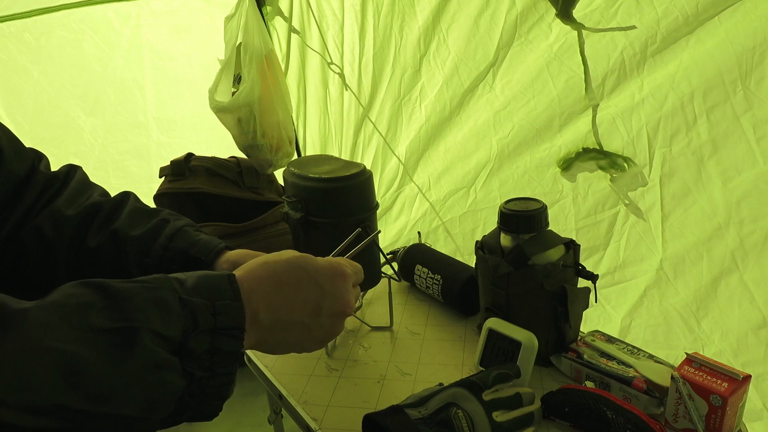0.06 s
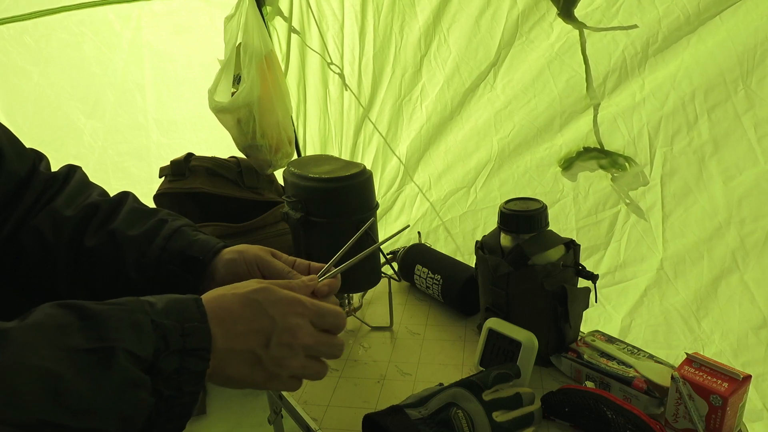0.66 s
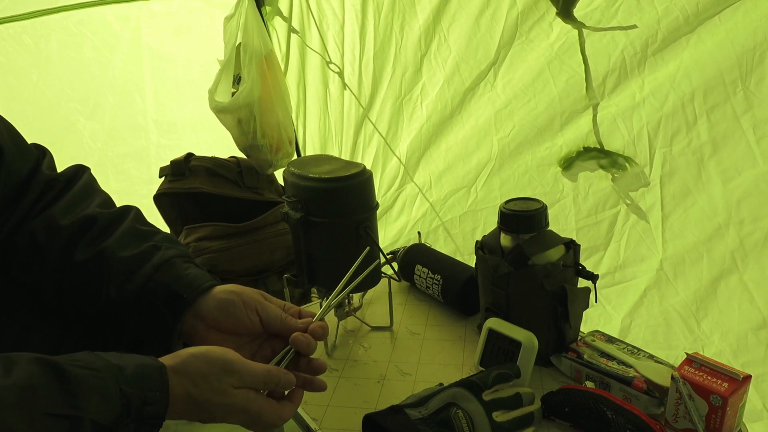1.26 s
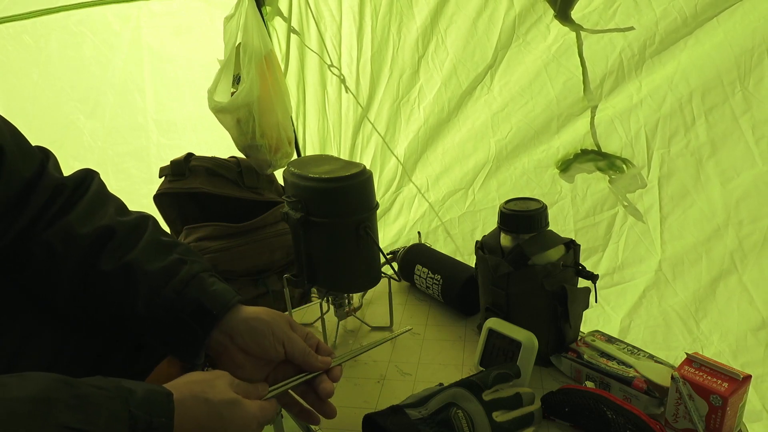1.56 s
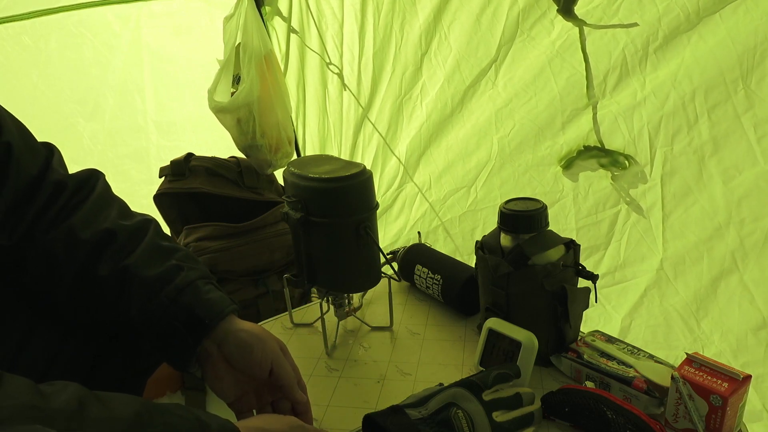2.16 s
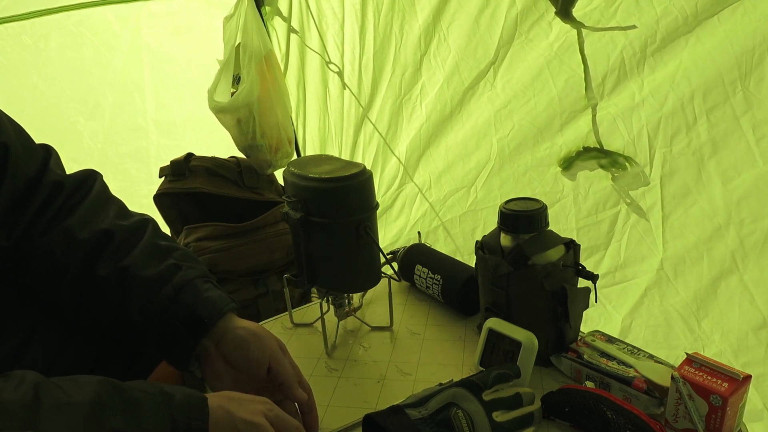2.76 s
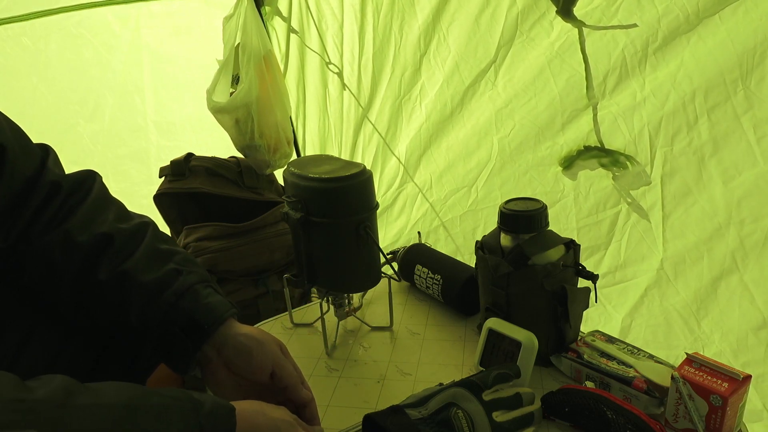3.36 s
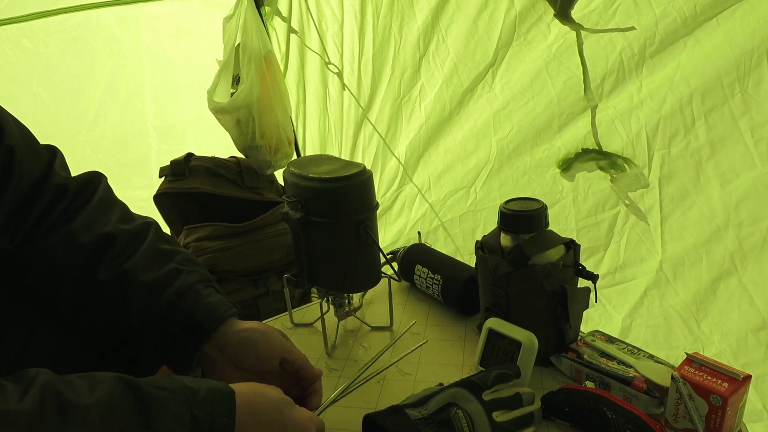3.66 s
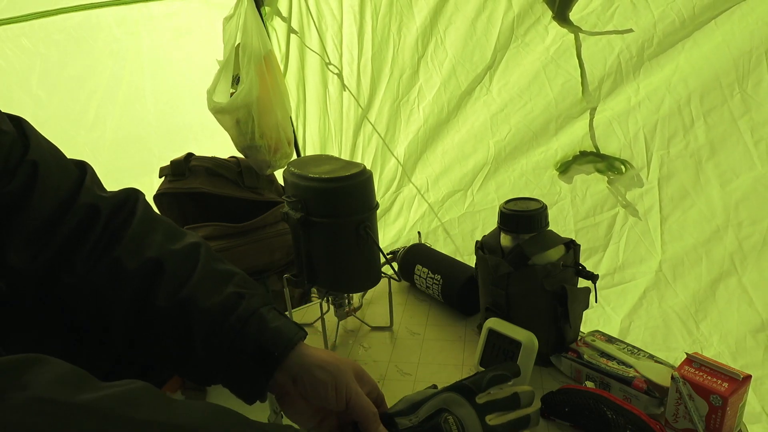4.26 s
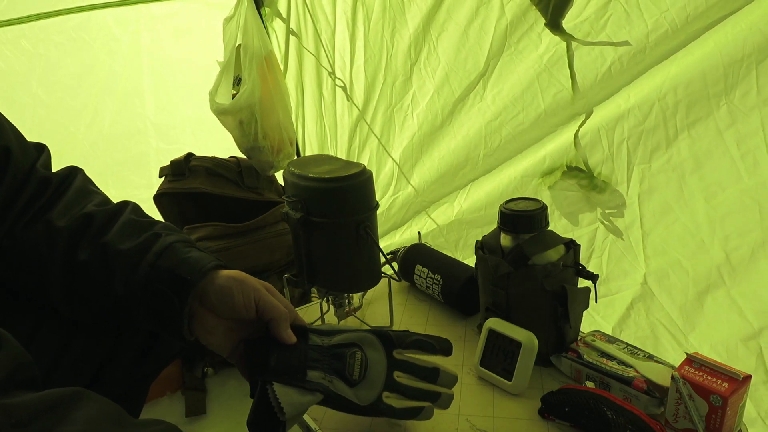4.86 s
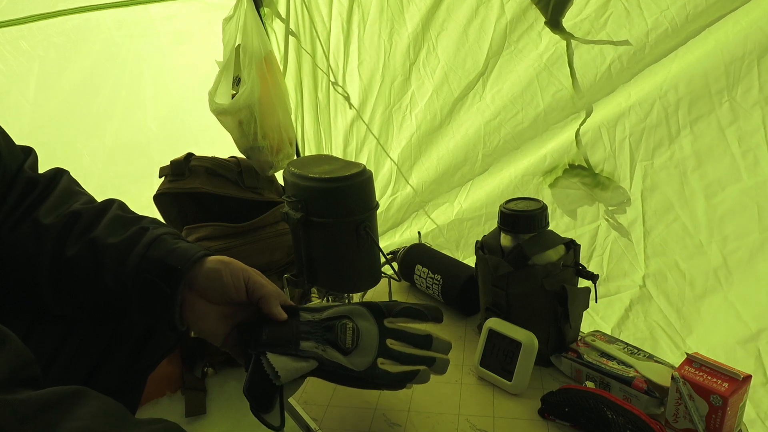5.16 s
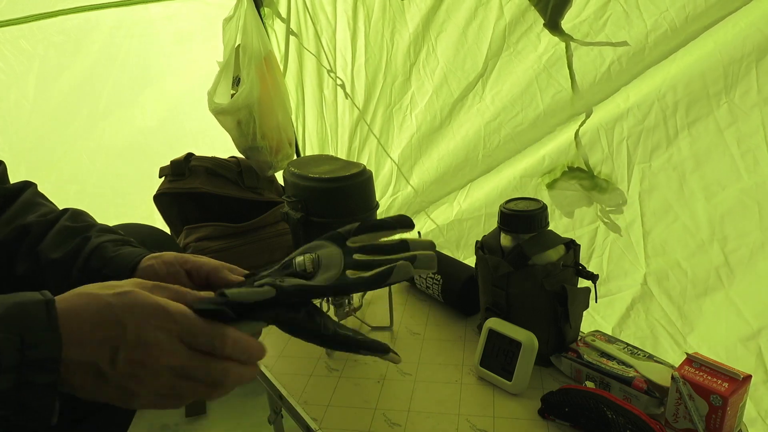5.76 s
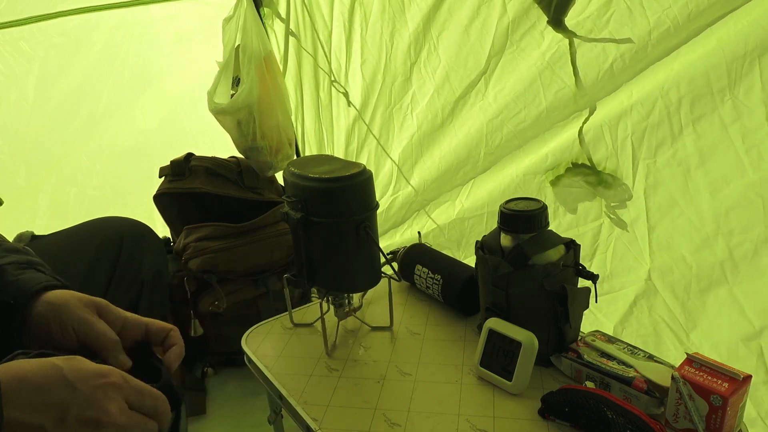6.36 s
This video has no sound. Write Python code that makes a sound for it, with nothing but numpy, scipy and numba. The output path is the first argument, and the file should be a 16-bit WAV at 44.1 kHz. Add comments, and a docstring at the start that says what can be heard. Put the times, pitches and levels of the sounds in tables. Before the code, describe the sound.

Metal tongs clink lightly, then clatter and slide on a camping table, followed by rustling sleeves and small glove snaps.

```python
"""Thin steel tongs clink in the hands, then knock, slide and clatter on a light metal camping table.
Each contact rings the steel's modes or the table's sheet; stick-slip makes the slides squeal and scrape.
Nylon sleeves swish and a glove snaps, with a few dull thuds, over the faint steady hiss inside a tent.
A fast compressor squashes each hard contact and lets its ring swell back up."""
import sys
import numpy as np
from scipy import signal
from scipy.fft import rfft, irfft, next_fast_len
from scipy.io import wavfile
from scipy.ndimage import uniform_filter1d, map_coordinates
from numba import njit

SR = 44100
rng = np.random.default_rng(int(sys.argv[2]) if len(sys.argv) > 2 else 0)


def bounce(signal):
    """Save signal as a 16-bit WAV file at the path given by the first command-line argument."""
    frames = np.transpose(np.atleast_2d(signal))
    limited = np.clip(frames, -1, 1)
    pcm = np.round(limited * 32767).astype(np.int16)
    wavfile.write(sys.argv[1], SR, pcm)


N = 282681

# tent hiss: freq_hz, density_db
HISS_SPECTRUM = [(12, -6), (20, -8.5), (46, -2), (88, -7), (127, -5), (163, -7), (285, -8), (399, -7.5),
                 (558, -13), (607, -13.5), (14700, -37), (16000, -38)]
# dull thuds and low knocks, one under the first loud clink: start_s, level_db, pitch_hz, ring_cycles
THUDS = [(.829, -31.5, 625, 5.4), (1.475, -45.5, 1170, 18), (1.729, -38, 65.3, 6.6), (1.781, -44, 61, 6.8),
         (1.872, -28, 91, 2.8), (3.018, -36, 550, 92), (4.043, -36, 234, 17), (4.046, -34, 700, 13),
         (6.021, -33, 164, 5)]
# arm movements: start_s, end_s, swish_db, rub_re_swish_db
ARM_MOVES = [(.5, 0.576, -62, -1.5), (0.718, .79, -39, -3), (1.054, 1.224, -46, -3),
             (1.486, 1.61, -50.5, -2.5), (1.71, 1.884, -40.5, 0), (2.053, 2.142, -47.5, 0.5),
             (2.587, 2.674, -46.5, 0), (2.8, 2.995, -56.5, -2), (3.093, 3.416, -49.5, 0),
             (3.762, 3.977, -42.5, -1.5), (4.103, 4.177, -36, -2), (4.251, 4.27, -30.5, -5),
             (4.605, 4.83, -39, -4), (4.986, 5.16, -49.5, -3), (5.295, 5.352, -53.5, 1.5),
             (5.41, 5.5, -38.5, -2), (5.572, 5.674, -35, -3.5), (5.77, 5.936, -32, -5.5),
             (6.183, 6.214, -35.5, -2), (6.23, 6.285, -45, 5.5), (6.362, 6.41, -37, -7)]
# dull nylon rub: freq_hz, density_db
RUB_SPECTRUM = [(150, -13), (300, -1.5), (700, 1.5), (1300, 1.5), (2200, -1.5), (3500, -21.5),
                (7000, -15.5)]
# bright nylon swish: freq_hz, density_db
SWISH_SPECTRUM = [(1200, -10), (2500, 1.5), (3800, 1.5), (6000, -1.5), (8500, -1.5), (11000, -9),
                  (15500, -13.5)]
# glove fabric and buckle snaps: start_s, relative_db, centre_hz
SNAPS = [(5.17, -22.5, 1600), (5.209, -27, 3950), (5.244, -31, 3980), (5.2619, -14.5, 12300),
         (5.384, -14.5, 8760), (5.391, -17, 5000), (5.68, -18, 3120), (5.6968, -14.5, 7670),
         (5.785, -23, 12000), (5.82, -21, 12000), (6.004, -20.5, 2000), (6.026, -13, 2150),
         (6.052, -8.5, 2140), (6.17, -12.5, 2210), (6.184, -15, 2190)]

# table sheet: freq_hz, width_hz, gain_db
SHEET_MODES = [(216, 28, 1.5), (301, 27, 0), (430, 108, -1.5), (500, 60, -7), (732.4, 20, 4.5),
               (818, 38, 0.5), (934, 58, -1), (1057, 83, -1), (1230, 43, 2), (1371, 110, 0),
               (1683, 400, -8), (2184, 540, -6.5), (2647, 120, -2.5), (2940, 81, -5.5), (3088, 29, 1.5),
               (3407, 180, -1), (3660, 130, -5.5), (3820, 83, 0.5), (4182, 83, -0.5), (4720, 360, -7),
               (5200, 210, -14), (5970, 510, -3.5), (7040, 500, -10), (9300, 1030, -10.5)]
# steel arm pressed on the table: freq_hz, width_hz, gain_db
PRESSED_MODES = [(1240, 165, 1), (2450, 140, -2), (3830, 250, -1.5), (5840, 1300, -10), (7200, 1600, -11.5)]
# steel lying free: freq_hz, width_hz, gain_db
FREE_MODES = [(5350, 270, -12), (7780, 40, 5), (7920, 180, -3), (10670, 390, -17), (14150, 130, -11),
              (14700, 120, -18.5)]
# lower bending modes of the steel: freq_hz, width_hz, gain_db
SHANK_MODES = [(1940, 74, -3), (3140, 140, 12), (3340, 93, -8), (3590, 300, 4.5), (4770, 120, -1.5)]
# hard contact: freq_hz, density_db
CRACK_SPECTRUM = [(5000, -37), (8700, 10.5), (10600, -8), (12000, 3), (13500, 2), (14500, -8), (15800, 1)]

# tips judder lightly on the table: start_s, end_s, relative_db
LIGHT_SLIDES = [(2.6, 2.7, -39), (2.725, 2.765, -30), (2.83, 2.875, -31), (2.9, 2.98, -38),
                (3.14, 3.16, -43)]
# tongs dragged with a heavier hand: start_s, end_s, relative_db
HEAVY_DRAGS = [(4.47, 4.62, -33.5), (4.65, 4.665, -17), (4.68, 4.735, -21.5), (4.75, 4.89, -31.5),
               (4.912, 4.925, -20.5)]
# tips stay on the table, which hums: start_s, end_s, relative_db
RESTS = [(2.57, 3.34, -46.5)]
# hand bears down, table booms: start_s, end_s, relative_db
LEANS = [(4.44, 4.53, -25), (4.66, 4.77, -28.5), (4.9, 4.93, -38)]
# one steel arm skids and sings, or taps the table once (4.43 s) so its pressed modes ring: start_s, end_s,
# level_db
SKIDS = [(1.9, 1.935, -33), (3.48, 3.518, -37.5), (3.58, 3.62, -35.5), (4.431, 4.433, -13.5),
         (4.44, 4.46, -37)]
# steel arms slide along each other: start_s, end_s, level_db
GRAZES = [(1.066, 1.085, -36), (1.1, 1.115, -45), (1.203, 1.24, -34), (1.255, 1.275, -42)]
# steel arms touch: start_s, level_db, low_mode_hz, low_mode_bias_db, shank_re_level_db
CLINKS = [(.829, -13.5, 5550, -1, -8.5), (.874, -29, 5400, -2, -9), (.984, -32.5, 5800, 1, -3.5),
          (1.075, -42, 6350, 0, 0.5), (1.202, -33, 6130, 7.5, -15), (1.21, -26.5, 6420, 4, -6.5),
          (1.22, -29, 5860, -3, -21), (1.231, -27, 5910, 5, -26), (1.256, -41, 6130, 1, -17),
          (1.39, -29.5, 5700, -1, -18), (1.403, -21, 5720, 5.5, -9), (1.523, -44.5, 5470, -2.5, -4.5),
          (1.628, -33, 5570, -5.5, -14), (4.738, -19, 5400, 2.5, -14), (4.802, -26, 5450, 2, -14),
          (4.811, -22, 5350, 2, -12), (5.057, -21, 5440, -9, -13)]
# tongs hit the table: start_s, force_db, hardness_db, steel_ring_db
KNOCKS = [(1.874, -5, 2.5, -21), (1.898, -23.5, 7, -24), (1.914, -31, 0, -24), (1.997, -9.5, 0, -27),
          (2.02, -21, 2, -43), (2.043, -20.5, 2, -58), (2.059, -26.5, 1, -46), (2.099, -40, -2.5, -42),
          (2.165, -36, -11, -60), (2.171, -25, 0.5, -43), (2.182, -42, -14.5, -61), (2.979, -39, -9, -61),
          (3.014, -27, 0, -20), (3.027, -26.5, 3.5, -41), (3.114, -41, -1.5, -68),
          (3.182, -31.5, -1.5, -22.5), (3.222, -15, 1.5, -23), (3.241, -18, 1.5, -38),
          (3.252, -23.5, 1, -35), (3.266, -23.5, 0.5, -45), (3.279, -29.5, 2, -47), (3.39, -31, 1, -23.5),
          (3.509, -34, -2, -42), (3.606, -30, 1, -42), (4.43, -33, 10.5, -21), (4.566, -13.5, 2.5, -22),
          (4.658, -13.5, -.5, -33), (4.675, -17.5, -3.5, -29), (4.735, -16, 0.5, -36), (4.757, -19, 1, -22),
          (4.81, -15.5, 1, -9), (4.831, -9.5, 2, -16), (4.85, -20, 3, -37), (4.862, -12, 4.5, -17),
          (4.892, -16.5, 1, -44), (4.908, -32, -5, -29), (5.057, -25, 3, -28), (5.084, -30, 0.5, -23)]

RING_TIME_S = np.arange(16384) / SR
MODE_SPREAD_DB = 5.5  # blow-to-blow scatter


def amp(db):
    return 10 ** (np.asarray(db) / 20)


def unit_rms(x):
    return x / np.sqrt(np.mean(x ** 2) + 1e-20)


def wobble(rate_hz):
    """Smooth random curve, rate_hz knots a second."""
    return map_coordinates(rng.standard_normal(int(N * rate_hz / SR) + 4), [np.arange(N) * rate_hz / SR])


def spectrum(points):
    """Gain curve through (freq_hz, gain_db) points."""
    freq_hz, gain_db = np.transpose(points)
    return lambda hz: amp(np.interp(np.log(hz + 1), np.log(freq_hz), gain_db))


def resonant(modes, lo_hz=30, hi_hz=18000, spread_db=0, count=1):
    """Band-limited gain curve of (freq_hz, width_hz, gain_db) modes, scattered anew per blow."""
    freq_hz, width_hz, gain_db = np.transpose(modes)
    power = amp(gain_db + spread_db * rng.standard_normal((count, len(freq_hz)))) ** 2
    def gain(hz):
        peaks = (1 + (2 * (hz - freq_hz[:, None]) / width_hz[:, None]) ** 2) ** -1.4
        edge_loss = (1 + (lo_hz / (hz + 1)) ** 10) * (1 + (hz / hi_hz) ** 10)
        return np.squeeze(np.sqrt(power @ peaks / edge_loss))
    return gain


def noise(gain, shape=N):
    """Coloured noise, rms 1."""
    white = rng.standard_normal(shape)
    size = next_fast_len(white.shape[-1])
    shaped = rfft(white, size) * gain(np.fft.rfftfreq(size, 1 / SR))
    return unit_rms(irfft(shaped, size)[..., :white.shape[-1]])


def rings(gain, t60_s, tail_db, tail_t60_s, attack_s=0.00011, count=1):
    """Responses to count blows: fast decay plus slower tail, rms 1 over the first 11 ms."""
    fade = amp(-60 * RING_TIME_S / t60_s) + amp(tail_db - 60 * RING_TIME_S / tail_t60_s)
    x = noise(gain, (count, len(RING_TIME_S))) * fade * (1 - np.exp(-RING_TIME_S / attack_s))
    return x / np.sqrt(np.mean(x[:, RING_TIME_S < .011] ** 2, axis=1, keepdims=True))


def placed(times_s, levels_db, sounds):
    """Sum of sounds, each at its time and level."""
    out = np.zeros(N + SR)
    for start_s, level_db, sound in zip(times_s, levels_db, sounds):
        out[round(start_s * SR):][:len(sound)] += amp(level_db) * sound
    return out[:N]


def strokes(rows, rise_s, fall_s):
    """Power-summed envelope of (start_s, end_s, level_db) moves; rise_s and fall_s per 20 dB."""
    t = np.arange(N) / SR
    power = 0
    for start_s, end_s, level_db in rows:
        away = np.maximum(start_s - t, 0) / rise_s + np.maximum(t - end_s, 0) / fall_s
        power += amp(level_db - 20 * np.minimum(away, 10)) ** 2
    return np.sqrt(power)


def tent_hiss():
    """Faint steady noise, strongest in the bass."""
    return amp(-51.5) * noise(spectrum(HISS_SPECTRUM))


def thuds():
    """Short dull thuds and low knocks: the more cycles of ring, the narrower the band."""
    start_s, level_db, pitch_hz, ring_cycles = np.transpose(THUDS)
    sounds = []
    for hz, cycles in zip(pitch_hz, ring_cycles):
        band = resonant([(hz, hz * 4 / cycles, 0)], hz * .5, hz * 2)
        sounds.extend(rings(band, t60_s=cycles / hz, tail_db=-12, tail_t60_s=3 * cycles / hz))
    return placed(start_s, level_db, sounds)


def sleeves():
    """Nylon on nylon: dull rub and bright swish, with weave grain and crackling creases."""
    still_swish_db, still_rub_db, creases_per_s = -59.5, -59, 58
    start_s, end_s, swish_db, rub_re_swish_db = np.transpose(ARM_MOVES)
    moves = lambda level_db: strokes(zip(start_s, end_s, level_db), rise_s=.25, fall_s=.2)
    swish_env = np.hypot(moves(swish_db), amp(still_swish_db))
    rub_env = np.hypot(moves(swish_db + rub_re_swish_db), amp(still_rub_db))
    grain = unit_rms(amp(1.1 * wobble(900) + wobble(45)))
    creases = (rng.random(N) < creases_per_s / SR) * amp(-0.5 + 5.5 * rng.standard_normal(N))
    crease_env = signal.fftconvolve(creases, amp(-60 * RING_TIME_S / .0032))[:N]
    crackle = swish_env * crease_env * noise(spectrum(SWISH_SPECTRUM))
    rub = rub_env * noise(spectrum(RUB_SPECTRUM))
    swish = swish_env * noise(spectrum(SWISH_SPECTRUM))
    return grain * (rub + swish) + crackle


def glove():
    """Creases flick over with dry snaps: the brighter, the shorter and more sudden."""
    start_s, relative_db, centre_hz = np.transpose(SNAPS)
    snaps = []
    for hz in centre_hz:
        t60_s = np.interp(hz, [2000, 13000], [.025, .006])
        attack_s = np.interp(hz, [2000, 13000], [.002, .0002])
        band = resonant([(hz, hz * .38, 0), (7000, 12000, -15)], lo_hz=350)
        snaps.extend(rings(band, t60_s, tail_db=-7.5, tail_t60_s=.083, attack_s=attack_s))
    return placed(start_s, relative_db - 15, snaps)


def slides():
    """Steel sticks and slips on the table: light touch squeals and hums, heavy scrapes and booms."""
    light = strokes(LIGHT_SLIDES, rise_s=.028, fall_s=.026)
    heavy = strokes(HEAVY_DRAGS, rise_s=.055, fall_s=.028)
    resting = strokes(RESTS, rise_s=.32, fall_s=.3)
    leaning = strokes(LEANS, rise_s=.06, fall_s=.18)
    slips = unit_rms(amp(2 * wobble(140)))
    pressure = unit_rms(amp(2.2 * wobble(50)))
    hum_env = amp(-2.5) * resting + amp(-18.5) * light
    hum = hum_env * noise(resonant([(296.3, 47, 7), (408, 58, -19)], 150, 500))
    squeal = amp(-7) * light * noise(resonant([(1345, 73, 0.5), (1100, 1500, -14.5)], 620, 6400))
    boom = amp(-4) * leaning * noise(resonant(SHEET_MODES + [(174, 38, -6)], 150, 320))
    scrape = amp(-5) * heavy * noise(resonant(SHEET_MODES + [(980, 260, 0.01)], 360, 7300))
    skid = strokes(SKIDS, rise_s=.0027, fall_s=.029) * noise(resonant(PRESSED_MODES, 490, 12000))
    return hum + skid + pressure * (squeal + boom) + slips * scrape


def grazes():
    """Steel rubs on steel; tiny slips keep its modes singing."""
    modes = [(2600, 500, -9), (3500, 500, -9), (6350, 700, 1), (8036, 300, -2)]
    song = noise(resonant(modes, 1900, 9500))
    slips = unit_rms(amp(5.2 * wobble(250)))
    return strokes(GRAZES, rise_s=.0053, fall_s=.022) * slips * song


def clinks():
    """The steel arms touch: grip shifts three modes together, touch point favours the low or main one."""
    start_s, level_db, low_hz, bias_db, shank_re_level_db = np.transpose(CLINKS)
    count = len(start_s)
    grip_shift = low_hz / 5750  # 1 = medium grip
    main_hz, high_hz = 8036 * grip_shift ** .15, 10900 * grip_shift ** .62
    attacks_s = np.interp(level_db, [-38, -20], [.002, .0006])  # quieter clinks: softer onset

    def mode(pitches_hz, width_hz, tail_db, tail_t60_s):
        bands = (resonant([(hz, width_hz, 0)], hz * .25, hz * 2.3) for hz in pitches_hz)
        return [rings(band, .024, tail_db, tail_t60_s, attack_s)[0]
                for band, attack_s in zip(bands, attacks_s)]

    shank = rings(resonant(SHANK_MODES, 1500, 4800, MODE_SPREAD_DB, count),
                  t60_s=.024, tail_db=-5, tail_t60_s=.084, attack_s=.00051, count=count)
    top = rings(resonant([(13000, 700, -9), (14500, 550, -3)], lo_hz=11000),
                t60_s=.02, tail_db=-13, tail_t60_s=.16, count=count)
    low = mode(low_hz, width_hz=370, tail_db=-11.5, tail_t60_s=.14)
    main = mode(main_hz, width_hz=250, tail_db=-12.5, tail_t60_s=.14)
    high = mode(high_hz, width_hz=750, tail_db=-1, tail_t60_s=.12)
    layers = [(shank_re_level_db, shank), (bias_db, low), (-bias_db, main), (-5.5, high), (-10, top)]
    return sum(placed(start_s, level_db + offset_db, sounds) for offset_db, sounds in layers)


def knocks():
    """Tongs hit the table: a crack, a new mix of sheet modes, a steel ring. Harder is brighter."""
    start_s, force_db, hardness_db, steel_ring_db = np.transpose(KNOCKS)
    count, medium_force_db = len(start_s), -20.5
    boom_db = -31 + .87 * (force_db - medium_force_db) - 1.07 * hardness_db
    panel_db = force_db - 1.5 - hardness_db
    clatter_db = force_db + 1.1 + hardness_db
    crack_db = force_db - 17 + 3.5 * hardness_db
    attack_s = np.interp(clatter_db, [-30, -12], [.004, .0006])[:, None]  # quieter knocks: softer onset
    # contact point decides which of the two lowest modes leads
    boom_edge_hz = np.interp(start_s, [1.9, 2.2, 3.6, 4.4], [174, 228, 230, 175])
    boom = [rings(resonant(SHEET_MODES, hz, hz * 1.46),
                  t60_s=.13, tail_db=5, tail_t60_s=.19, attack_s=.0021)[0] for hz in boom_edge_hz]
    panel = rings(resonant(SHEET_MODES, 570, 2270, MODE_SPREAD_DB, count),
                  t60_s=.072, tail_db=-12, tail_t60_s=.11, attack_s=attack_s, count=count)
    clatter = rings(resonant(SHEET_MODES, 2100, 7900, MODE_SPREAD_DB, count),
                    t60_s=.03, tail_db=-1, tail_t60_s=.079, attack_s=attack_s, count=count)
    steel = rings(resonant(FREE_MODES, 5500, 15000, spread_db=3.5, count=count),
                  t60_s=.091, tail_db=-7, tail_t60_s=.11, attack_s=.0005, count=count)
    crack = rings(spectrum(CRACK_SPECTRUM),
                  t60_s=.019, tail_db=-21.5, tail_t60_s=.21, attack_s=.00032, count=count)
    layers = [(boom_db, boom), (panel_db, panel), (clatter_db, clatter),
              (steel_ring_db, steel), (crack_db, crack)]
    return sum(placed(start_s, level_db, sounds) for level_db, sounds in layers)


def scene():
    """Tent hiss, tongs, table, clothing and thuds; mono."""
    return (tent_hiss() + clinks() + grazes() + knocks() + slides() + sleeves() + glove() + thuds())[None]


@njit
def follow(target, attack_s, release_s):
    """One-pole follower with separate rise and fall times."""
    out, held = np.zeros(len(target)), 0.
    for i in range(len(target)):
        lag_s = attack_s if target[i] > held else release_s
        held += (target[i] - held) / (lag_s * SR)
        out[i] = held
    return out


def compressor(x, threshold_db, attack_s, release_s):
    """Cuts the gain by the 1 ms level's excess over the threshold."""
    level_db = 10 * np.log10(np.abs(uniform_filter1d(x ** 2, size=44)) + 1e-12)
    excess_db = np.maximum(level_db - threshold_db, 0)
    return x * amp(-follow(excess_db, attack_s, release_s))


def record(dry):
    """Fast compression, soft clip, brick-wall low-pass."""
    ceiling, cutoff_hz = .55, 15900
    x = compressor(dry[0], threshold_db=-19, attack_s=.0035, release_s=.0099)
    x = x / (1 + np.abs(x / ceiling) ** 4) ** (1 / 4)
    size = next_fast_len(N + SR)
    passband = np.fft.rfftfreq(size, 1 / SR) < cutoff_hz
    return irfft(rfft(x, size) * passband, size)[None, :N]


dry = scene()
out = record(dry)
bounce(out)
```